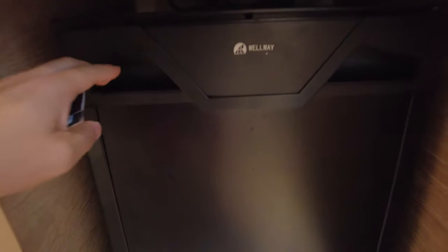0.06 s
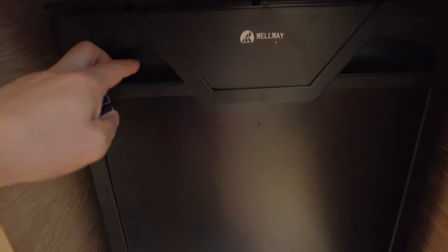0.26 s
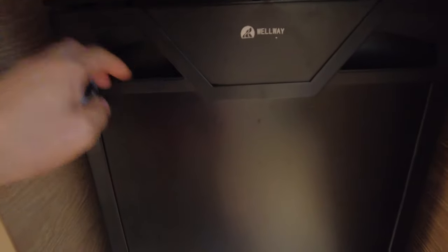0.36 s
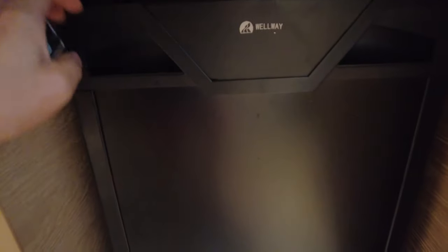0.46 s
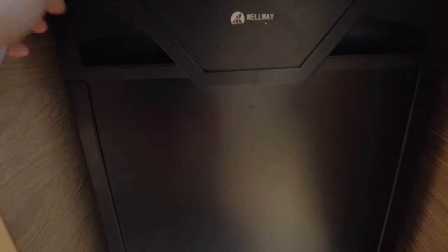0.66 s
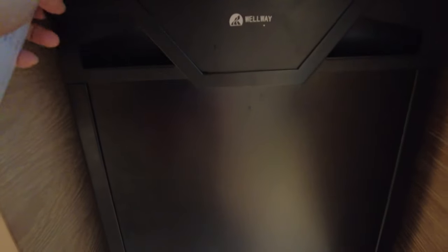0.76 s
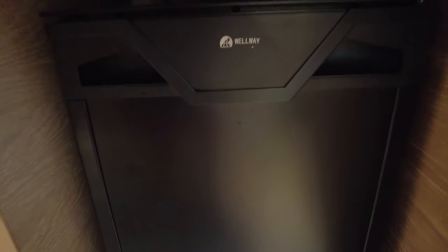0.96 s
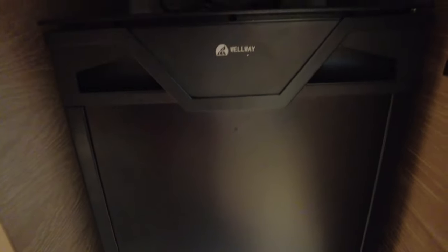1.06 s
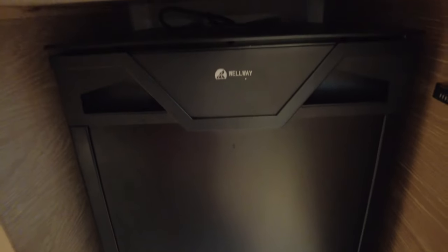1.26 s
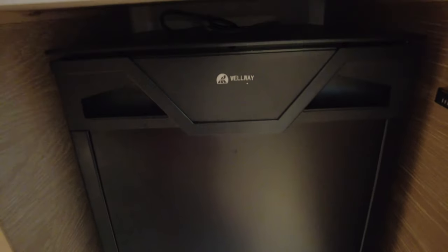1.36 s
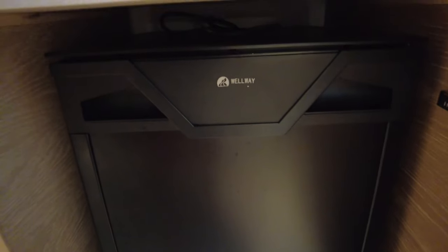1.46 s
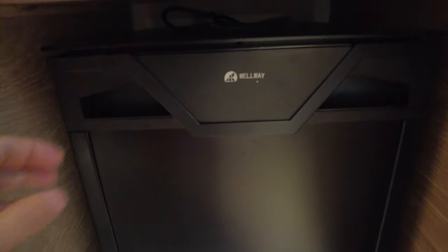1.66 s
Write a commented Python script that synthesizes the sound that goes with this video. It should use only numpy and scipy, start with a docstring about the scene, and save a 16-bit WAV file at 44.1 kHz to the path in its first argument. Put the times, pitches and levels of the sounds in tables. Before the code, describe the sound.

A small fridge door gives a sharp plastic clack with a boomy cabinet thump, then softer knocks, clicks and finger rubbing, and a late bright tick, close to a handheld phone in a quiet room.

```python
"""A small fridge door knocks against its cabinet, which booms briefly, as a hand works the grip.
The knocks ring cabinet modes; the plastic grip clicks as ringing modes with a bright noise snap.
Fingers rub the grip: stick-slip grains ring it, hiss drily and creak in the cabinet.
Behind lie a low rumble and faint hiss of the quiet room, all heard close by through a handheld phone."""
import sys
import numpy as np
from scipy import signal
from scipy.fft import rfft, irfft
from scipy.io import wavfile
from scipy.ndimage import uniform_filter1d

SR = 44100
rng = np.random.default_rng(int(sys.argv[2]) if len(sys.argv) > 2 else 0)


def transcribe(signal):
    """Save signal, clipped to [-1, 1], as a 16-bit WAV file at the path in sys.argv[1]."""
    frames = np.atleast_2d(signal).T
    limited = np.clip(frames, -1, 1)
    pcm = np.round(limited * 32767).astype(np.int16)
    wavfile.write(sys.argv[1], SR, pcm)


N = 74970  # length in samples

# Cabinet modes: f/Hz, relative level/dB, t60/s (before any ring-time factor)
CABINET_MODES = [(58, 4, 0.27), (78.8, 16, 0.088), (130, 5, 0.076), (198, -3, 0.077), (245.7, -11, 0.27),
                 (290.8, -5, 0.094), (402.7, -9, 0.069), (500, -12.5, 0.044), (580, -37, 0.026)]
# Plastic grip modes: f/Hz, relative level/dB, t60/s (before any ring-time factor)
GRIP_MODES = [(671, 10.5, 0.095), (974, 3.5, 0.16), (1250, -14.5, 0.16), (1354, -10.5, 0.12),
              (1624, 12.5, 0.014), (2192, 7, 0.045), (2467, 11.5, 0.041), (2702, 5, 0.086),
              (2850, 7, 0.048), (3206, 6.5, 0.099), (3800, -1, 0.024), (4350, -22, 0.03),
              (5800, 28, 0.0097)]


def undb(db):
    """Decibels to linear amplitude."""
    return 10 ** (np.asarray(db, float) / 20)


def rms1(x):
    """Scale to an RMS of 1."""
    return x / np.sqrt(np.mean(x ** 2))


def colour(x, table):
    """Filter by (f/Hz, gain/dB) points on a log-frequency axis, without phase shift."""
    points = np.array(table, float)
    f = np.arange(len(x) // 2 + 1) * SR / len(x)
    gain_db = np.interp(np.log(f + 1), np.log(points[:, 0] + 1), points[:, 1])
    return irfft(rfft(x) * undb(gain_db), len(x))


def fade(t60, size):
    """Exponential decay that falls 60 dB in t60 seconds."""
    return np.exp(-np.log(1000) * np.arange(size) / SR / t60)


def ring(modes, size):
    """Impulse response of a body: a sum of decaying sines from (f/Hz, level/dB, t60/s) modes."""
    t = np.arange(size) / SR
    return sum(undb(db) * np.sin(2 * np.pi * hz * t) * fade(t60, size) for hz, db, t60 in modes)


def add(out, s, x):
    """Mix x into out at s seconds, cut at the end."""
    i = int(s * SR)
    out[i:i + len(x)] += x[:len(out) - i]


def conv(x, h):
    """Convolve and keep the scene's length."""
    return signal.fftconvolve(x, h)[:N]


def along(tables, col):
    """Join the rows of each stretch by straight lines; a new stretch starts at once."""
    t, out = np.arange(N) / SR, np.zeros(N)
    for k, rows in enumerate(tables):
        points = np.array(rows, float)
        on = t >= points[0, 0] * (k > 0)
        out[on] = np.interp(t[on], points[:, 0], points[:, col])
    return out


def curve(tables, col):
    """Level column in dB as a linear gain, eased over 3 ms."""
    ease_s = 0.003
    return uniform_filter1d(undb(along(tables, col)), int(ease_s * SR))


def knocks():
    """Smooth pushes, the longer the duller, ring the cabinet modes near the pitch they strike."""
    # Knocks on the cabinet: t/s, peak level/dB, direction +-1, contact/ms, pitch struck most f/Hz,
    # reach/octaves (distance at which a mode is struck 6 dB less)
    blows = [(0.01, -34, 1, 4.2, 141, 0.55), (0.2118, -23.5, -1, 1.3, 225, 0.7),
             (0.2137, -20, 1, 1.1, 77, .58), (0.2206, -34, -1, 4.9, 130, 0.37),
             (0.2226, -26.5, -1, 0.71, 213, 0.54), (0.229, -24, 1, 2, 107, 0.65),
             (.257, -35.5, -1, 2.9, 70, .58), (0.283, -31, 1, 2.1, 64.5, .58),
             (0.338, -49, 1, 1.9, 200, 0.68), (0.372, -35.5, -1, 4, 84, 0.3),
             (0.3904, -29, 1, 1.3, 205, 0.25), (0.3998, -36.5, -1, 0.44, 500, 0.21),
             (0.406, -40, -1, 0.99, 268, 0.22), (0.411, -33.5, -1, 0.92, 527, 0.22),
             (0.4198, -36, -1, 0.74, 500, 0.33), (0.425, -36, 1, 1.9, 198, 0.56),
             (0.454, -50, -1, 3.6, 245, 0.55), (0.467, -34, -1, 1.3, 300, 0.49),
             (0.5996, -36, 1, 2, 258, 0.42), (0.6121, -39, 1, 0.59, 434, 0.42),
             (0.6054, -34.5, -1, 1.07, 242.5, 0.2), (0.618, -49, -1, 0.89, 300, 0.18),
             (0.637, -47, 1, 1.7, 102, .5), (0.701, -36, -1, 2, 71, 0.94), (0.758, -40, 1, 0.17, 457, 0.56),
             (0.808, -39.5, 1, 3.3, 150, 0.49), (0.825, -37, -1, 4.7, 148, 0.93),
             (0.878, -34, -1, 4.1, 62.4, 0.52), (0.8975, -31, 1, 1.1, 200, 0.35),
             (0.9006, -37.5, -1, 1.1, 233, 0.33), (0.909, -32, 1, 2.2, 58, 0.25),
             (1.313, -45.5, 1, 2.1, 402, 0.21), (1.342, -38.5, 1, 0.61, 217, 0.39),
             (1.359, -41, -1, 0.67, 221, 0.58)]
    out = np.zeros(N)
    for s, db, way, ms, hz, reach in blows:
        struck = [(f, d - 6 * (np.log2(f / hz) / reach) ** 2, t60) for f, d, t60 in CABINET_MODES]
        push = np.hanning(int(ms * SR / 1000) + 3)
        body = signal.fftconvolve(ring(struck, size=12000), push)
        add(out, s, np.sign(way) * undb(db) * body / np.abs(body).max())
    return out


def clicks():
    """Each click rings the grip modes near its pitch and adds a bright snap with a thin tail."""
    # Clicks of the grip: t/s, peak level of the ring/dB, pitch struck most f/Hz, reach/octaves,
    # snap level re the ring/dB, ring-time factor, snap tilt/dB per octave
    grip_clicks = [(0.2124, -25.5, 2210, 0.11, -9.5, 0.2, 1), (0.2132, -25.5, 2400, 1, -11, 0.12, -1),
                   (0.2157, -38, 2450, 0.35, -11, 0.5, -3), (0.221, -49, 2200, .5, -16, .4, -3),
                   (.2255, -46, 2600, 0.54, -15, 0.44, -3), (0.2296, -27.5, 1810, 0.42, -13.5, 0.6, 1.5),
                   (0.2317, -30.5, 1250, 0.17, -31, 0.15, -3), (.2368, -33, 2090, .3, -12, 0.46, -6),
                   (0.2425, -34.5, 2250, .3, -13, .4, -3), (0.2473, -40, 2220, 0.33, -28, 0.26, -11),
                   (0.255, -46, 1250, 0.24, -25, 0.27, 0), (0.357, -46, 1210, 0.21, -25, 0.4, 12),
                   (0.3693, -47, 2400, 0.28, -19, .5, 0), (0.3924, -46, 1600, .15, -25, 1.6, 0),
                   (0.401, -46, 1600, 0.13, -25, 3.3, 0), (.412, -44, 2660, 0.061, -23, 1.3, 0),
                   (.4265, -42.5, 2690, 0.08, -22, 0.38, 0), (0.525, -48, 1520, 0.73, -24, 0.64, -9),
                   (.534, -44.5, 690, 0.12, -40, 0.48, 1), (.548, -47.5, 3000, 0.47, -12, 0.39, -3),
                   (0.5866, -35.5, 1560, 0.23, -16.5, 2.1, 2), (.5895, -40, 960, 0.35, -40, 0.45, 10),
                   (0.6012, -34, 1190, 0.24, -23, 0.3, 7), (.642, -62.5, 2800, 0.65, 12, 0.76, 12.5),
                   (0.725, -51, 1680, 0.25, -31, 3.4, 23), (0.7552, -47, 1500, 0.33, -18, 3.2, 3),
                   (0.867, -46.5, 1590, 0.22, -27, 0.88, -10), (0.878, -48, 1380, 0.15, -6, 0.56, 4.5),
                   (0.9, -50.5, 1460, 0.41, -37, 1.1, -9), (1.311, -34, 1550, 0.069, 6.5, 0.95, 17),
                   (1.3117, -32, 2450, 0.22, -1, 0.47, 17), (1.316, -48.5, 3800, 0.11, -10, 0.55, 8),
                   (1.386, -52, 1690, 0.31, -33, 2.4, 0)]
    # Spectrum of the snap before its tilt: f/Hz, level/dB
    snap_shape = [(1500, -37), (3000, 5), (4500, 4), (8000, -7.5), (13500, -13.5), (16000, -11)]
    pitch_scatter, level_scatter_db = 0.006, 1.5  # the first as a fraction of each mode's pitch
    rise_s = 0.0011  # the ring builds up during the contact
    snap_t60_s, snap_tail_db, snap_tail_t60_s = 0.0069, -32, 0.017
    tick_db = 6  # first contact over the snap noise
    out, size = np.zeros(N), 4000
    for s, db, hz, reach, snap_db, ring_factor, tilt_db in grip_clicks:
        scatter = rng.standard_normal((len(GRIP_MODES), 2))
        struck = []
        for (f, d, t60), (a, b) in zip(GRIP_MODES, scatter):
            mode_db = d + level_scatter_db * b - 6 * (np.log2(f / hz) / reach) ** 2
            struck.append((f * (1 + pitch_scatter * a), mode_db, t60 * ring_factor))
        tone = -ring(struck, size) * (1 - fade(rise_s, size))

        tilted = [(f, d + tilt_db * np.log2(f / 4000)) for f, d in snap_shape]
        hiss = rms1(colour(rng.standard_normal(size), tilted))
        tick = colour(1. * (np.arange(size) == 12), tilted)
        snap = hiss * (fade(snap_t60_s, size) + undb(snap_tail_db) * fade(snap_tail_t60_s, size))
        snap[:60] += undb(tick_db) * tick[:60] / tick.max()
        add(out, s, undb(db) * (tone / np.abs(tone).max() + undb(snap_db) * snap))
    return out


def rub():
    """Skin sticks and slips on plastic: grains ring the grip, hiss drily and creak in the cabinet."""
    # Finger rubbing, one list per stretch of rubbing; a new list lets the levels change suddenly:
    # t/s, grip ring level/dB, dry hiss level/dB, its top octave level/dB, cabinet creak level/dB,
    # pitch touched on the grip f/Hz, creak pitch f/Hz
    strokes = [
        [(0.0, -67, -78, -77, -47, 1420, 244), (0.018, -69, -82, -102, -50, 1520, 254),
         (0.036, -70.5, -77, -89, -49.5, 1650, 256), (0.112, -69.5, -79.5, -89, -63, 1600, 278),
         (0.186, -70, -76, -83, -60, 1370, 275), (0.2, -73, -104, -101, -52.5, 1200, 277)],
        [(0.215, -44, -44, -44, -42, 2210, 242), (0.223, -49, -61, -67, -38, 2210, 238),
         (0.228, -68, -47.5, -59, -32, 2210, 241)],
        [(0.232, -50, -49.5, -53, -32.5, 1410, 246), (0.244, -48.5, -54.5, -66, -37.5, 1500, 252),
         (0.268, -49, -94, -67, -43.5, 1800, 249), (0.29, -47.5, -53, -85, -46, 2320, 240),
         (0.33, -60.5, -82, -72, -50, 2160, 268), (0.35, -67, -72, -84, -51, 1930, 278)],
        [(0.352, -61, -68, -69, -44.5, 1960, 260), (0.368, -56, -63.5, -64.5, -49.5, 2190, 260),
         (0.382, -51.5, -62, -61.5, -46, 2330, 265), (0.402, -52, -65, -68.5, -37.5, 2220, 283),
         (0.431, -56, -62, -72, -53, 2650, 300)],
        [(0.434, -62.5, -72, -83, -43.5, 2090, 284), (0.474, -65.5, -78, -101, -50.5, 1680, 273),
         (0.512, -70, -81.5, -102, -61, 1560, 306), (0.526, -65.5, -75, -73, -44, 1510, 316),
         (0.544, -66.5, -68, -72, -55, 1680, 288), (0.58, -67.5, -71.5, -74, -54, 1490, 285)],
        [(0.588, -48, -63, -74, -50, 1600, 270), (0.61, -60.5, -71.5, -75, -44.5, 1420, 297),
         (0.708, -69.5, -86, -93, -55.5, 1470, 243), (0.756, -59.5, -75, -72.5, -54.5, 1480, 327),
         (0.83, -78, -101, -102, -53, 1380, 227), (0.86, -69, -79, -102, -69, 1510, 235)],
        [(0.862, -67, -95, -77, -56, 1440, 247), (0.88, -63.5, -67, -84, -48.5, 1400, 250),
         (0.916, -66.5, -99, -102, -46.5, 1450, 255), (0.948, -69, -80.5, -73.5, -48.5, 1390, 246),
         (0.984, -74, -93, -102, -60, 1420, 247), (1.0, -68.5, -72, -93, -52, 1480, 255)],
        [(1.002, -71, -85, -78, -63, 1560, 269), (1.038, -74, -83, -91, -59, 1430, 266),
         (1.088, -68, -70, -70.5, -62, 2120, 282), (1.134, -70.5, -80, -88, -63, 1660, 279),
         (1.26, -73.5, -74, -75, -58.5, 2530, 274), (1.3, -67, -73.5, -70, -64, 1660, 275)],
        [(1.313, -48.5, -49.5, -40, -66, 1920, 317), (1.333, -57, -59.5, -72, -52, 2260, 279),
         (1.365, -55, -63.5, -54.5, -57, 1850, 247), (1.41, -65, -67, -114, -59, 1800, 270),
         (1.597, -74.5, -99, -102, -64, 1480, 274), (1.69, -71, -100, -82, -71, 1310, 253)],
    ]
    slip = grains(2435, scatter_db=1.5)
    grip = rubbed(slip, GRIP_MODES, along(strokes, col=5), reach=0.55, ring_factor=0.32)
    creak_slip = grains(700, scatter_db=2.5)
    # the creak leaves out the two lowest cabinet modes
    creak = rubbed(creak_slip, CABINET_MODES[2:], along(strokes, col=6), reach=0.98, ring_factor=0.55)

    dry_skin = slip + 0.77 * rng.standard_normal(N)
    hiss = rms1(colour(dry_skin, [(2600, -22), (3800, 0.5), (7000, -6.5), (10000, -13.5), (16000, -90)]))
    top = rms1(colour(dry_skin, [(5500, -19.5), (8500, -14.5), (14000, -7.0), (16200, -9.5)]))

    out = grip * curve(strokes, 1)
    out += hiss * curve(strokes, 2)
    out += top * curve(strokes, 3)
    return out + creak * curve(strokes, 4)


def grains(per_second, scatter_db):
    """Stick-slip impulses of either sign at random moments, a few much stronger than the rest."""
    moment, sign, strength = rng.random((N, 3)).T
    size = undb(-scatter_db * np.log(strength + 0.0018))
    return rms1((moment < per_second / SR) * np.sign(sign - .5) * size)


def rubbed(drive, modes, touched, reach, ring_factor):
    """Grains ring the modes near a moving pitch (reach in octaves); level near 1."""
    shares = [undb(d - 6.8 * (np.log2(f / touched) / reach) ** 2) for f, d, t60 in modes]
    rung = 0
    for share, (f, d, t60) in zip(shares, modes):
        rung = rung + share * rms1(conv(drive, ring([(f, 0, t60 * ring_factor)], size=4000)))
    return rung / np.sqrt(sum(share ** 2 for share in shares))


def room_tone():
    """Faint ventilation noise whose octaves flicker independently, over a wandering rumble."""
    # Spectrum of the room noise: f/Hz, relative level/dB per Hz
    room_shape = [(12, -39), (20, -5.5), (70, -7.5), (108, -14), (249, -19.5), (278, -48), (319, -18),
                  (693, -39.5), (796, -36), (1020, -40.5), (1550, -47.5), (15000, -73.5)]
    # Lowest rumble, one stretch: t/s, level/dB
    rumble_drift = [
        [(0.0, -43.5), (0.118, -47), (0.232, -59), (0.302, -47), (0.606, -58), (0.718, -44.5), (0.756, -60),
         (0.928, -46.5), (0.998, -48), (1.126, -50.5), (1.144, -52), (1.614, -52), (1.632, -45.5), (1.7, -82)],
    ]
    room_gain_db, flicker_db = -53, 2.5
    step = 2000  # samples between new flicker levels
    base = rms1(colour(rng.standard_normal(N), room_shape))
    hiss = 0
    for hz in 45 * 2. ** np.arange(9):
        held = np.repeat(rng.standard_normal(N // step + 1), step)[:N]
        walk = rms1(uniform_filter1d(held, step))
        # about the octave below hz: steep lower edge, gentler slope above
        band = [(hz / 2, -40), (hz / 1.933, -3), (hz, 0), (hz * 0.98, -3), (hz * 2, -40)]
        hiss = hiss + colour(base, band) * undb(flicker_db * walk)
    low = rms1(colour(rng.standard_normal(N), [(12, 9), (25, 22.0), (50, 15), (90, -47.5)]))
    return hiss * undb(room_gain_db) + low * curve(rumble_drift, 1)


def scene():
    """Near sounds with a short echo; the left microphone port leads, and each has its own reflections."""
    # Filter of the side signal: f/Hz, gain/dB
    side_gain = [(30, -21), (80, -28), (150, -29), (280, -24), (500, -3), (1000, -14), (2000, -12),
                 (4000, -3), (12000, -7.5)]
    echo_db, echo_t60_s, spread_t60_s, diffuse_db = -15.5, 0.12, 0.1, 5
    near = knocks() + clicks() + rub()
    size = 15000
    late = np.arange(size) > .004 * SR  # the echo starts after 4 ms
    tail = rng.standard_normal(size) * fade(echo_t60_s, size) * late
    mid = near + undb(echo_db) * conv(near, tail / np.sqrt(np.sum(tail ** 2)))

    spread = rng.standard_normal(size) * fade(spread_t60_s, size)
    diffuse = conv(mid, spread / np.sqrt(np.sum(spread ** 2))) + room_tone()
    mid = mid + room_tone()

    quarter_ahead = irfft(1j * rfft(mid), N)  # a quarter cycle early at every pitch
    side = colour(quarter_ahead + undb(diffuse_db) * diffuse, side_gain)
    return np.array([mid + side, mid - side])


def record(dry):
    """The phone cuts the top: a steep low-pass at 16 kHz."""
    top_cut = signal.ellip(10, .2, 80, 16000, fs=SR, output="sos")
    return signal.sosfilt(top_cut, dry)


dry = scene()
out = record(dry)
transcribe(out)
```